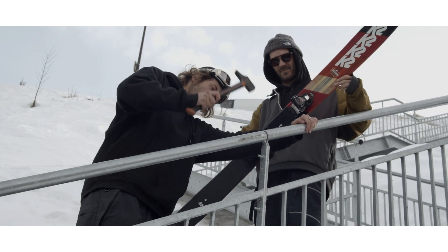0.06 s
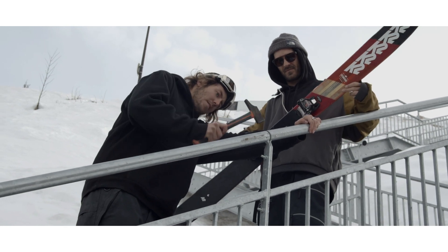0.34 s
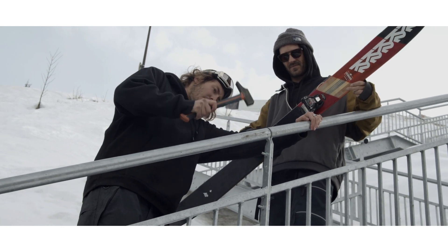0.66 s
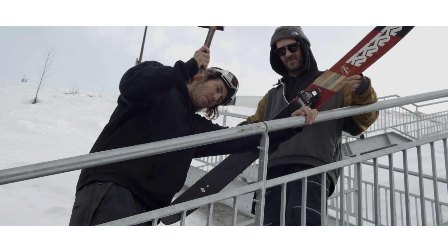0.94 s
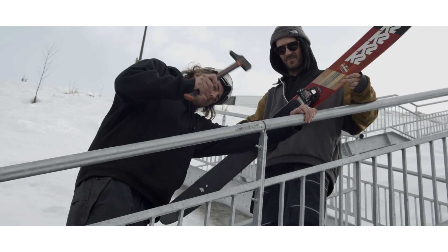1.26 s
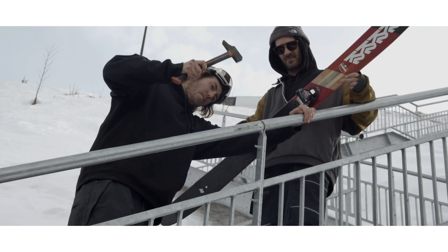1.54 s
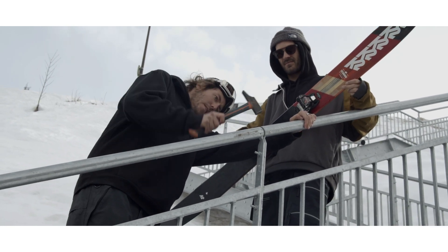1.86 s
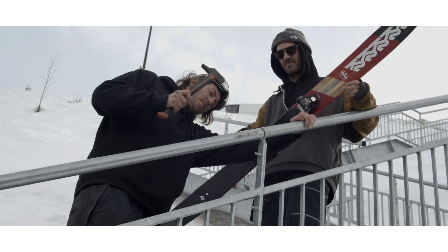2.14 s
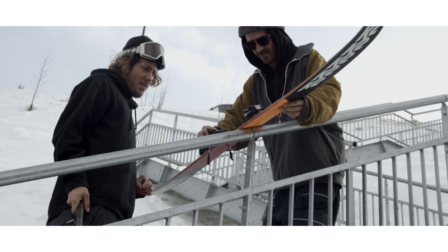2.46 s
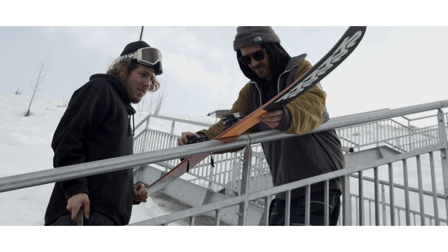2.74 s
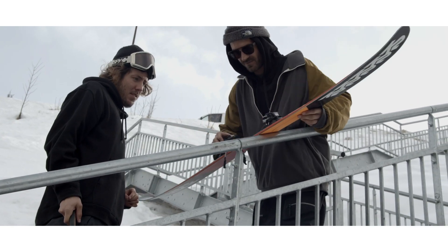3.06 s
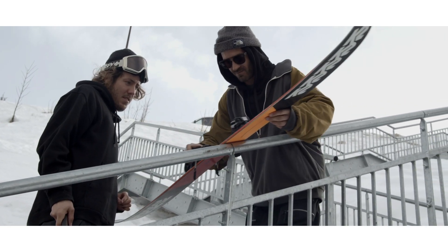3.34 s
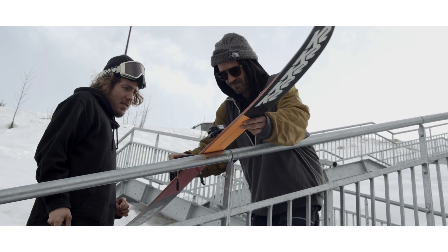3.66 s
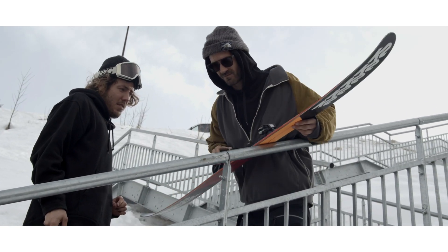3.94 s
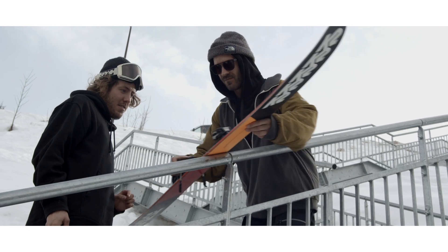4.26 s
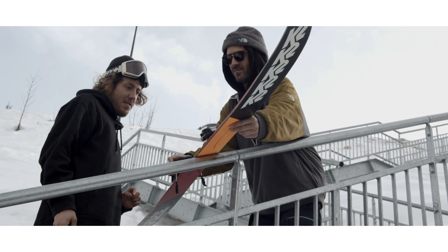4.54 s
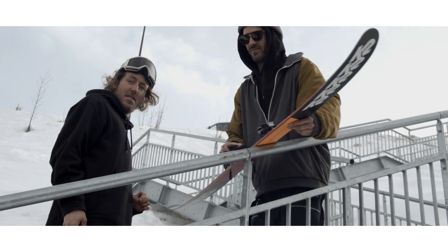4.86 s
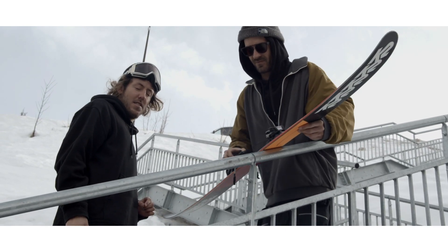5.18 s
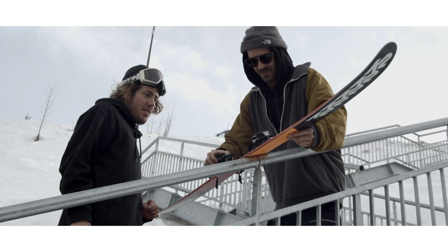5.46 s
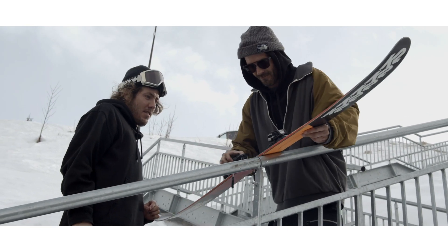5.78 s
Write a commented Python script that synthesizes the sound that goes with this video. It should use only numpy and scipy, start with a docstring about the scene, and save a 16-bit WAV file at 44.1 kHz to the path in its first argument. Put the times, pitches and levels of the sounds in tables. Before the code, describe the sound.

Outdoors, a hammer strikes a ski laid on a steel handrail three times at an even pace. Each blow cracks and clangs, and the railing rings on between them. The ringing drops abruptly, and the ski's edge is worked to and fro on the rail in quieter strokes, with knocks, gritty scrapes and short rising squeals that set the tube ringing. Faint wind rumbles underneath.

```python
"""A hammer strikes a ski laid on the handrail of an outdoor steel stair: each blow cracks, clangs and
leaves the railing ringing. Then the ski's steel edge is worked to and fro on the rail: each stroke
swells, lands with a knock, and scrapes or squeals upward by stick-slip until it catches. The tube
rings on after it. Faint wind rumbles underneath."""
import sys
import numpy as np
from scipy import signal
from scipy.fft import rfft, irfft
from scipy.io import wavfile
from scipy.ndimage import uniform_filter1d

SR = 44100
rng = np.random.default_rng(int(sys.argv[2]) if len(sys.argv) > 2 else 0)


def inscribe(sig):
    """Save sig as 16-bit PCM at rate SR to the path in sys.argv[1].

    A 1-D sig is mono; a 2-D sig holds one channel per row.
    Samples are clipped to [-1, 1] before scaling.
    """
    pcm = np.round(np.clip(np.atleast_2d(sig).T, -1, 1) * 32767)
    wavfile.write(sys.argv[1], SR, pcm.astype(np.int16))


N = 260631
TIME_S = np.arange(N) / SR
AGE_S = TIME_S[:2 * SR]  # time since an event began


def amp(db):
    """Decibels to gain."""
    return 10 ** (np.asarray(db) / 20)


def unit(x):
    """Scale to rms 1."""
    return x / np.sqrt(np.mean(x ** 2))


def at(points, hz):
    """Read (Hz, value) points on a log-frequency axis."""
    points_hz, values = np.transpose(points)
    return np.interp(np.log(np.maximum(hz, 1)), np.log(points_hz), values)


def colour(x, spectrum):
    """Filter x by (Hz, dB) points, to rms 1."""
    gain = amp(at(spectrum, np.fft.rfftfreq(len(x), 1 / SR)))
    return unit(irfft(rfft(x) * gain, len(x)))


def fade(t60_s):
    """Free decay, 60 dB in t60_s."""
    return np.exp(-np.log(1000) * AGE_S / max(t60_s, .002))


def rise(tau_s):
    """Exponential attack."""
    return 1 - np.exp(-AGE_S / tau_s)


def flutter(samples):
    """Random wobble of rms 1, smooth over the given length."""
    noise = rng.standard_normal(len(AGE_S))
    return unit(uniform_filter1d(uniform_filter1d(noise, samples), samples))


def add(track, start_s, sound):
    """Mix a sound in at start_s."""
    i = int(round(start_s * SR))
    part = sound[max(-i, 0):max(N - i, 0)]
    track[max(i, 0):max(i, 0) + len(part)] += part


def ring(modes, scatter_db, rise_cycles, detune=0.00031):
    """Decaying sines from (Hz, dB, T60 s) rows; each strike shares its energy a little differently."""
    modes_hz, modes_db, t60s = np.transpose(modes)
    level_draws, tuning_draws, phases = rng.standard_normal((len(modes), 3)).T
    gains = amp(modes_db + scatter_db * level_draws)
    gains /= np.sqrt(np.sum(gains ** 2) / 2)
    tuned_hz = modes_hz * (1 + detune * tuning_draws)
    out = 0
    for hz, gain, t60_s, phase in zip(tuned_hz, gains, t60s, phases):
        envelope = gain * fade(t60_s) * rise(rise_cycles / hz)
        out += envelope * np.sin(2 * np.pi * (hz * AGE_S + phase))
    return out


def dense_modes(spectrum, t60s, rise_cycles, bands=16):
    """Countless modes as noise decaying by band; bass bending waves are slow, so lows build up later."""
    bins = rfft(colour(rng.standard_normal(len(AGE_S)), spectrum))
    centres_hz = np.geomspace(80, 16000, bands)
    log_hz = np.log(np.fft.rfftfreq(len(AGE_S), 1 / SR) + 1)
    out = 0
    for hz, pick in zip(centres_hz, np.eye(bands)):
        band = irfft(bins * np.interp(log_hz, np.log(centres_hz), pick), len(AGE_S))
        out += band * fade(at(t60s, hz)) * rise(rise_cycles / hz)
    return out


def beating(hz, t60_s, spacing_hz=22):
    """Three close modes of the tube beat as they die away."""
    cluster = [(hz - spacing_hz, -4, t60_s), (hz, 0, t60_s), (hz + 1.4 * spacing_hz, -5, t60_s)]
    return ring(cluster, scatter_db=2, rise_cycles=2.2) * rise(0.0044)


def excite(force, response):
    """Drive a resonating body, its response scaled to unit energy."""
    return signal.fftconvolve(force, response / np.linalg.norm(response))[:N]


# Outdoor air spectrum. Each row: frequency in Hz, relative level in dB.
WIND_SPECTRUM = [(20, -6), (50, -1), (80, -3.5), (120, -7.5), (200, -10.5), (450, -13), (700, -15.5),
                 (1200, -19), (2200, -26), (3200, -31.5), (5000, -39.5), (8000, -47.5), (11000, -57),
                 (15500, -53)]


def wind():
    """Soft wind and distant hush; left and right differ mostly in the rumble."""
    side_spectrum = [(20, 1), (35, 0.5), (80, -5.5), (170, -12), (350, -14), (700, -15.5),
                     (1500, -31), (4000, -54.5), (12000, -54)]
    mid = amp(-51.5) * colour(rng.standard_normal(N), WIND_SPECTRUM)
    side = amp(-53.5) * colour(rng.standard_normal(N), side_spectrum)
    return np.array([mid + side, mid - side])


# Ski strokes. Each row: landing and catch in seconds, then gains in dB of landing, slide, catch and rub.
STROKES = [(2.439, 2.593, -32.5, -51, -39.5, -72), (2.848, 2.99, -40, -46, -50, -59),
           (3.3622, 3.455, -21.5, -37, -35, -49.5), (3.72, 3.7908, -32, -41, -33.5, -55),
           (4.2379, 4.3028, -21, -35.5, -24, -43), (4.7215, 4.8424, -36.5, -45, -37.5, -51.5),
           (5.2938, 5.325, -26.5, -44, -43, -46), (5.5654, 5.585, -44, -45.5, -47, -51),
           (5.8702, 5.898, -32.5, -35.5, -40, -56)]


def friction(swell_db_per_s=99, bite_s=0.0079, ease_step_db=-2, ease_db_per_s=119):
    """Sliding strength: a light rub swells, the edge bites, holds until the catch and eases off."""
    out = np.zeros(N)
    for land_s, catch_s, _, slide_db, _, rub_db in STROKES:
        swell_db = rub_db - swell_db_per_s * np.maximum(land_s - TIME_S, 0)
        ease_db = (TIME_S > catch_s) * (ease_step_db - ease_db_per_s * (TIME_S - catch_s))
        bite = np.clip((TIME_S - land_s) / bite_s, 0, 1)
        out = np.maximum(out, amp((1 - bite) * swell_db + bite * (slide_db + ease_db)))
    return out


def creaks(per_stroke=6, length_s=0.051, octaves_per_s=4.5, roughness=.03):
    """As the edge starts to move, a few contact points chirp faintly upward around each landing."""
    out = np.zeros(N)
    n = int(length_s * SR)
    for land_s, *_ in STROKES:
        for when, pitch in rng.random((per_stroke, 2)):
            hz = 1150 * 2 ** (1.4 * pitch + octaves_per_s * AGE_S[:n])
            hz *= 1 + roughness * flutter(samples=20)[:n]
            chirp = np.hanning(n) * np.sin(2 * np.pi * np.cumsum(hz) / SR)
            add(out, land_s - .15 + .17 * when, chirp)
    return amp(-10) * out * np.minimum(friction(), amp(-46.5))  # capped: harder sliding grinds instead


# Slip spectrum. Each row: frequency in Hz, relative level in dB.
GRIT_SPECTRUM = [(400, -24), (700, -20), (1200, -8), (1900, -4), (3000, -7), (4100, -5), (5200, -18),
                 (6300, -19), (8000, -25), (10000, -36.5), (15500, -36)]
# Modes of ski and rail pressed together. Each row: frequency in Hz, relative level in dB, T60 in seconds.
SKI_MODES = [(440, -12, .6), (486, -7, .7), (1180, -9, .5), (1750, -10, .5), (1958, -5, .7), (2019, -7, .5),
             (2400, -6, .6), (2852, -15, 1.8), (3439, -8, .5), (3639, -9, .6), (3985, -6, .35),
             (4083, -5, .35), (4347, -8, .4), (5097, -14, .35), (5506, -11, .45), (6142, -7, .4),
             (6202, -9, .35), (6460, -16, .35), (7025, -13, .45)]


def scrape(slips_per_s=2500):
    """Tiny slips of steel on steel, heard directly and through the modes of ski and rail."""
    slips = (rng.random(N) < slips_per_s / SR) * rng.standard_normal(N)
    slips *= amp(2.1 * rng.exponential(size=N))
    force = colour(slips, GRIT_SPECTRUM) * friction()
    body = ring(SKI_MODES, scatter_db=2, rise_cycles=3)
    return amp(-7.5) * force + amp(-19) * excite(force, body)


# Edge squeals. Each row: start and end in seconds, first and last pitch in Hz, gain in dB,
# octave re fundamental in dB, after-ring gain in dB.
SQUEALS = [(2.858, 2.972, 1000, 1540, -53.5, -8, -51.5), (3.244, 3.391, 1000, 1760, -59, 2, -48.5),
           (3.37, 3.431, 3400, 3434, -52, -32, -40.5), (3.725, 3.818, 1450, 2042, -42, -2.5, -46),
           (4.118, 4.245, 1350, 2050, -61, 0, -58), (4.249, 4.299, 2330, 2423, -33, -15, -46.5),
           (4.725, 4.866, 1130, 1497, -50.5, 1, -60)]


def squeals(roughness=.03):
    """Stick-slip speeds up, chatters as the grip changes and steadies as it locks to the rail."""
    out = np.zeros(N)
    for start_s, end_s, first_hz, last_hz, db, octave_db, _ in SQUEALS:
        n = int((end_s - start_s) * SR)
        progress = np.linspace(0, 1, n)
        waver, grip, bite = (flutter(samples=150)[:n] for _ in range(3))
        hz = last_hz + (first_hz - last_hz) * (1 - progress) ** 1.6 * (1 + .1 * waver)
        hz *= 1 + roughness * flutter(samples=30)[:n]
        phase = 2 * np.pi * np.cumsum(hz) / SR
        pressure = (0.86 + progress) * np.sqrt(4 * progress * (1 - progress))
        fundamental = unit(amp(3 * grip)) * np.sin(phase)
        octave = amp(octave_db) * unit(amp(5 * bite)) * np.sin(2 * phase)
        add(out, start_s, amp(db) * pressure * (fundamental + octave))
    tube = dense_modes(spectrum=[(500, 4), (2500, 8), (8000, -7)],
                       t60s=[(1400, 0.97), (2400, 1.0), (4200, 0.93)], rise_cycles=2.8)
    return amp(-4) * out + amp(-11.5) * excite(out, tube)


# Tube decay after a squeal. Each row: frequency in Hz, T60 in seconds.
SING_DECAY = [(1500, 0.92), (2400, 1.5), (3400, 0.65), (6500, 0.083)]
# Tube partial gains in dB: fundamental, octave.
SING_PARTIALS_DB = [-0.5, -11]


def singing(lock_s=.03):
    """Just before a squeal ends, the tube takes up its last pitch and the octave and rings on."""
    out = np.zeros(N)
    for _, end_s, _, last_hz, _, _, ring_db in SQUEALS:
        for harmonic, db in enumerate(SING_PARTIALS_DB, 1):
            hz = harmonic * last_hz
            add(out, end_s - lock_s, amp(ring_db + db) * beating(hz, at(SING_DECAY, hz)))
    return out


# Knock spectrum. Each row: frequency in Hz, relative level in dB.
KNOCK_SPECTRUM = [(180, -4), (300, -2), (494, 0), (713, -7), (1320, -6), (2100, 1), (3520, -5),
                  (4090, -10.5), (5430, -22), (6200, -21), (10400, -42.5), (13300, -44), (16000, -44)]


def rattle(t60_s, tilt_db_per_decade=10.5):
    """Brief chatter of the edge meeting the rail."""
    tilted = [(hz, db + tilt_db_per_decade * np.log10(hz / 2500)) for hz, db in KNOCK_SPECTRUM]
    noise = colour(rng.standard_normal(len(AGE_S)), tilted)
    return amp(-1.5) * noise * fade(t60_s) * rise(0.0016)


# Railing decay after a knock. Each row: frequency in Hz, T60 in seconds.
KNOCK_DECAY = [(300, 1.8), (1100, 1.56), (2200, 1.05), (3600, 0.64), (5500, 0.36), (9000, .45),
               (15000, .35)]
# Burrs snapping off the edge. Each row: start in seconds, gain in dB.
BURR_TICKS = [(2.9143, -38), (2.9345, -31.5)]


def knocks():
    """The edge knocks as it lands and catches, ringing ski and rail; burrs snap off with bright ticks."""
    out = np.zeros(N)
    body = amp(-23) * dense_modes(KNOCK_SPECTRUM, KNOCK_DECAY, rise_cycles=1.2)
    body += amp(-20) * ring(SKI_MODES, scatter_db=-1, rise_cycles=3.1)
    for land_s, catch_s, land_db, _, catch_db, _ in STROKES:
        bending_note = amp(-26) * beating(hz=481, t60_s=1)
        add(out, land_s, amp(land_db) * (rattle(t60_s=.034) + body + bending_note))
        add(out, catch_s, amp(catch_db) * (rattle(t60_s=.061) + body))
    for start_s, db in BURR_TICKS:
        add(out, start_s, amp(db) * rattle(t60_s=.032, tilt_db_per_decade=30))
    return out


# Hammer blows, the first already ringing at time zero. Each row: start in seconds, gain in dB.
HAMMER_BLOWS = [(-.40, -2.5), (0.3465, 0.5), (1.1049, 1), (1.8442, 2)]
# Spectra of the contact and the railing's dense weak modes.
# Each row: frequency in Hz, relative level in dB.
CRACK_SPECTRUM = [(60, -5), (220, -13), (300, -5.5), (500, -7), (1150, -4.5), (1450, -8), (2300, -1),
                  (3100, -4.5), (4200, 0), (5200, -7.5), (7000, -14.5), (10000, -33), (15500, -32)]
WASH_SPECTRUM = [(100, -21.5), (230, -18.5), (300, -8.5), (550, -1.5), (750, -3), (1100, 3), (1400, -3.5),
                 (2200, -1), (3200, -6), (3900, -3), (5200, -14.5), (7200, -20), (10000, -34.5),
                 (15500, -32)]
# Decay of the same two. Each row: frequency in Hz, T60 in seconds.
CRACK_DECAY = [(150, 0.14), (700, .17), (2500, 0.052), (6000, 0.069), (14000, 0.067)]
WASH_DECAY = [(150, 3.1), (500, 1.9), (1100, 1.34), (2200, 1.474), (3600, 0.98), (5500, 0.8), (9000, 0.58),
              (15000, 0.4)]
# Short modes of the struck spot, long modes of the railing.
# Each row: frequency in Hz, relative level in dB, T60 in seconds.
CLANG_MODES = [(283, -20.4, 0.32), (436, -13.5, 0.4), (549, -10.5, 0.29), (786, -7.3, 0.3),
               (929, -11.9, 0.4), (984, -11.5, 0.36), (1071, -6.5, 0.29), (1118, -10.4, 0.4),
               (1183, 0.0, 0.19), (1250, -14, 0.37), (1635, -16.4, 0.4), (1678, -16.7, 0.4),
               (1964, -4.0, 0.14), (2001, -3.3, 0.16), (2046, -15.5, 0.35), (2385, -9.3, 0.4),
               (2854, -10.9, 0.32), (3393, -7.4, 0.16), (3421, -15, 0.35), (4047, -17.5, 0.35),
               (4810, -12.1, 0.14), (5518, -18.7, 0.27), (6141, -16.0, 0.18), (6196, -18.5, 0.22)]
RAIL_MODES = [(502, -2.1, 0.97), (540, -1.8, 0.88), (641, -7.8, 1.04), (794, -10.7, 1.86),
              (939, -14.4, 1.99), (1026, -9.4, 2.0), (1079, -0.8, 0.98), (1122, -6.5, 2.0), (1177, -7, 1.4),
              (1203, -6, 1.7), (1226, -2, 0.72), (1791, -11.0, 1.12), (1934, -9.7, 1.39),
              (1962, -13.5, 2.0), (1995, -5, 1.03), (2043, -14.7, 1.66), (2579, -8.7, 0.9),
              (2826, -2.8, 0.61), (2852, -7.5, 1.61), (3615, -10.0, 1.29), (3636, -5, 1.07),
              (3666, -5.5, 0.95), (3709, -7.9, 0.96), (3780, -8.4, 0.86), (4046, -13, 0.79),
              (4085, -6, 0.57), (4735, -9.2, 0.55), (5102, -11.4, 0.55), (5316, -20.5, 1.2),
              (5518, -17.0, 0.6), (6180, -15.0, 0.55), (7035, -21.0, 0.6)]


def hammer(drop_at_s=2.357, drop_db=-14, drop_length_s=0.0033):
    """Each blow cracks, clangs at the struck spot and rings the railing; the last ring drops abruptly."""
    out = np.zeros(N)
    # every blow wakes the same dense modes
    wash = amp(-23.2) * dense_modes(WASH_SPECTRUM, WASH_DECAY, rise_cycles=5.6)
    for start_s, db in HAMMER_BLOWS:
        crack = amp(-11) * dense_modes(CRACK_SPECTRUM, CRACK_DECAY, rise_cycles=3)
        clang = amp(-13.5) * ring(CLANG_MODES, scatter_db=1, rise_cycles=3)
        railing = amp(-22.5) * ring(RAIL_MODES, scatter_db=0.5, rise_cycles=45)
        add(out, start_s, amp(db) * (crack + clang + railing + wash))
    drop = np.clip((TIME_S - drop_at_s) / drop_length_s, 0, 1)
    return out * amp(drop_db * drop)


def scene():
    """Rail sounds in the centre, wind in stereo."""
    return hammer() + knocks() + scrape() + squeals() + singing() + creaks() + wind()


def record(dry):
    """Soft peak limiting, then a steep low-pass."""
    ceiling, cutoff_hz = 0.77, 16100
    lowpass = signal.ellip(8, .2, 70, cutoff_hz, fs=SR, output="sos")
    return signal.sosfilt(lowpass, ceiling * np.tanh(dry / ceiling))


dry = scene()
out = record(dry)
inscribe(out)
```